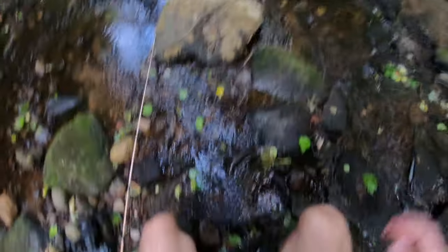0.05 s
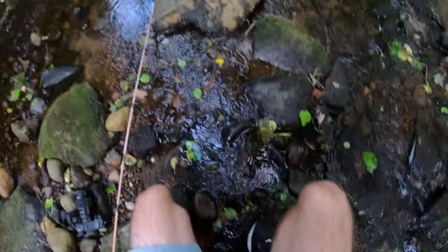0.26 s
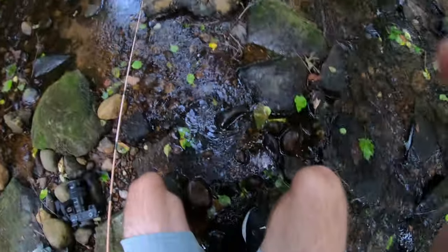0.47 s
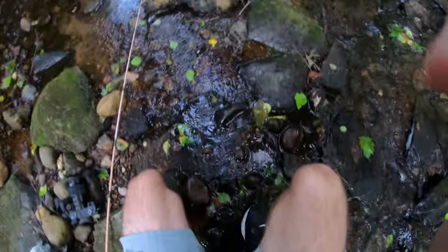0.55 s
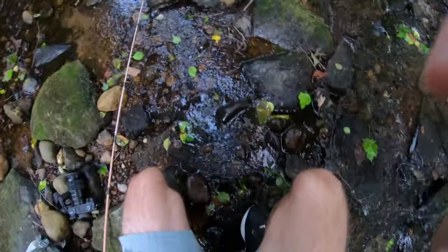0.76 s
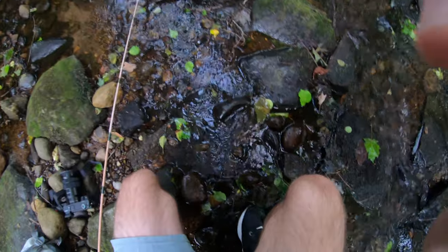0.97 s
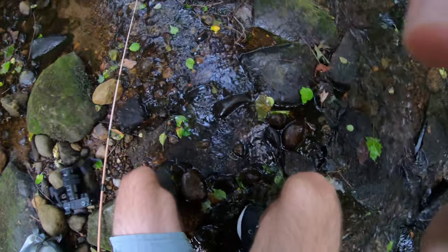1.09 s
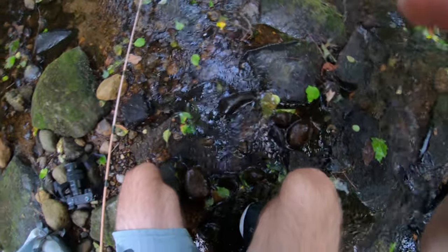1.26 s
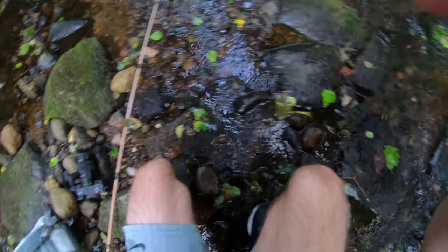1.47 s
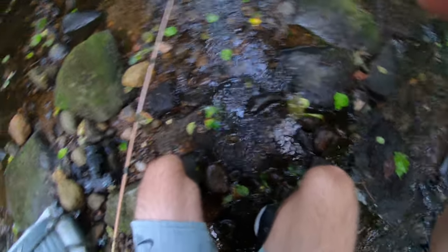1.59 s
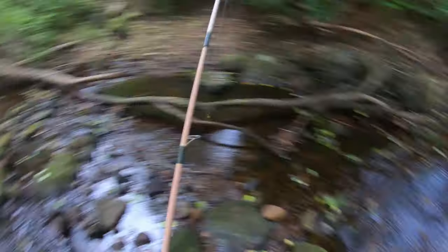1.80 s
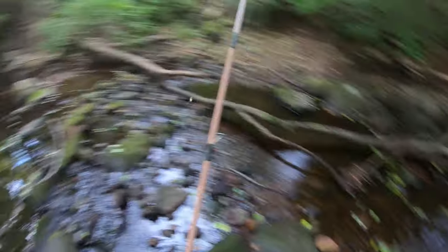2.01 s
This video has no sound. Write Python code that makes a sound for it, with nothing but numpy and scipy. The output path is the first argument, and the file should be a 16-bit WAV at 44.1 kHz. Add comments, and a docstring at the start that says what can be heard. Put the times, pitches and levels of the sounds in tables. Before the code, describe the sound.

A shallow creek runs over stones throughout, a soft wash with small bubbles, tiny drips and low rumble. At about 0.55 seconds a finger rubs the camera case with gritty hiss and a crack, scraping harder into a loud, left-heavy knock at 0.74. Faint rubbing follows near 0.86. Bubbling thickens from 1.2, the stereo narrows to mono, low glugs come after 1.6, and everything cuts to silence near 1.87.

```python
"""Creek and a finger on a camera case

A shallow creek gurgles over stones: coloured noise for the wash, gliding sine tones for the bubbles,
short rings with a spit of noise for the drips. A finger slides over a small head-worn camera, scrapes
and knocks its case: gritty noise, slip clicks, cracks, squeaks and a quickening swing.
Below lie a lumpy noise rumble, wavering hums and low glugs. The creek narrows to mono; then all is cut off.
"""
import sys
import numpy as np
from scipy import signal
from scipy.fft import rfft, irfft
from scipy.io import wavfile
from scipy.ndimage import uniform_filter1d

SR = 44100
rng = np.random.default_rng(int(sys.argv[2]) if len(sys.argv) > 2 else 0)


def master_out(mix):
    """Clip the mix to full scale and print it as 16-bit PCM to the path in sys.argv[1]."""
    frames = np.transpose(np.atleast_2d(mix))
    ceiling = np.clip(frames, -1, 1)
    pcm = np.round(ceiling * 32767).astype(np.int16)
    wavfile.write(sys.argv[1], SR, pcm)


N = 90316  # length in samples

# Tone colour of the wash, same in both ears: pitch_hz, relative level_db (per Hz)
WASH_COLOUR = [(88, -42.5), (150, 2), (366, -7.5), (1270, -17), (2550, -27.5), (4750, -23.5), (10500, -40),
               (15500, -56)]
# Tone colour of the left-right difference: pitch_hz, relative level_db (per Hz)
WASH_SIDE_COLOUR = [(40, -6), (321, -11), (2920, -5.5), (4030, -19), (5160, -7.5), (9840, -15.5),
                    (15000, -38.5)]
# How strongly the creek sounds over time: time_s, wash_db (rms), fizz_db (rms), side_db (rms)
CREEK_FLOW = [(0, -39.5, -45, -50.5), (.54, -39.5, -48, -47.5), (.8, -38.5, -51, -49),
              (1.1, -40.5, -50, -61), (1.2, -39, -45.5, -61), (1.4, -38.5, -42.5, -75),
              (1.62, -37.5, -40, -81.5), (1.87, -39.5, -41, -99)]
# Single bubbles: start_s, level_db (before the fade-out shape), pitch_hz (at 0.4 of the length)
SINGLE_BUBBLES = [(.023, -25, 1730), (.056, -33, 1230), (0.062, -31.5, 1440), (.114, -35, 1065),
                  (.142, -35, 674), (.237, -30.5, 980), (.273, -34, 1710), (.305, -34, 1525),
                  (.452, -35, 838), (.484, -35, 793), (.57, -31.5, 740), (.806, -35.5, 1043),
                  (.857, -26, 1215), (.941, -32.5, 820), (.954, -36, 1266), (1.015, -33.5, 1090),
                  (1.101, -26, 834), (1.248, -23.5, 758), (1.327, -29.5, 1576), (1.352, -25.5, 828),
                  (1.396, -27, 824), (1.417, -20, 738), (1.462, -29, 947), (1.472, -32, 2175),
                  (1.48, -30, 997), (1.608, -28, 1775), (1.612, -25.5, 1074), (1.622, -30, 850),
                  (1.72, -31.5, 1730), (1.751, -34.5, 800), (1.755, -24.5, 1484), (1.8, -29.5, 1020)]


def creek():
    """Water over stones: noise wash, swarms of bubbles, single bubbles, and a side signal that fades."""
    wash = amp(curve(CREEK_FLOW, 1)) * colour(patchy(patch_db=4.5, flicker_db=1.2), WASH_COLOUR)
    fizz_db = curve(CREEK_FLOW, 2)
    fizz = amp(fizz_db) * swarm(1253, 4500, per_s=4000, cycles=5.3, spread_db=3.5)
    gurgle = amp(fizz_db - 2.0) * swarm(750, 3500, per_s=500, cycles=14, spread_db=3.5, rise=.15)
    sparkle = amp(-64) * swarm(4500, 10000, per_s=200, cycles=5.5, spread_db=2.5)
    mid = wash + fizz + gurgle + sparkle
    for start_s, level_db, pitch_hz in SINGLE_BUBBLES:
        add(mid, start_s, amp(level_db) * bubble(pitch_hz, rise=0.067, length_s=0.01))
    side_noise = colour(patchy(patch_db=7.5, flicker_db=-1.0), WASH_SIDE_COLOUR)
    side = amp(curve(CREEK_FLOW, 3)) * side_noise
    return mid + side * [[1], [-1]]


def swarm(lo_hz, hi_hz, per_s, cycles, spread_db, rise=.05, count=30):
    """Many small bubbles at random moments and sizes, rms 1; low ones ring longer than high ones."""
    out = np.zeros(N)
    for hz in np.geomspace(lo_hz, hi_hz, count):
        size = amp(spread_db * np.minimum(rng.exponential(1, N), 4))
        starts = rng.random(N) < per_s / count / SR
        out += signal.oaconvolve(size * starts, bubble(hz, rise, cycles / hz))[:N]
    return evened(out)


def bubble(hz, rise, length_s):
    """A ringing bubble: quick start, pitch gliding up by rise octaves per length, dying away."""
    t = np.arange(0, 3 * length_s + .002, 1 / SR)
    u = t / (length_s + 1e-4)  # time counted in lengths
    pitch_hz = hz * 2 ** (rise * (u - .4))
    shape = np.minimum(t / .0008, 1) * np.exp(-u ** 1.3)
    return shape * np.sin(2 * np.pi * np.cumsum(pitch_hz) / SR)


def patchy(patch_db, flicker_db):
    """Noise with drifting loud and soft patches, strongest at low pitch, and a wide-band flicker."""
    hz, t, z = signal.stft(rng.standard_normal(N), SR, nperseg=512, noverlap=384)
    patches = uniform_filter1d(rng.standard_normal(z.shape), size=5, axis=0)
    patches = evened(uniform_filter1d(patches, size=10, axis=1))
    flicker = evened(uniform_filter1d(rng.standard_normal(len(t)), size=5))
    level_db = patch_db * patches / (1 + hz[:, None] / 4000) + flicker_db * flicker
    return signal.istft(z * amp(level_db), SR, nperseg=512, noverlap=384)[1][:N]


KNOCK_S = .7388  # moment of the knock
# Finger strength before the stereo lean: time_s, slide_db (light), scrape_db (hard)
RUB_LEVELS = [(.554, -56, -60), (.558, -33.5, -77), (.655, -33, -45.5), (.706, -37.5, -38.5),
              (.719, -31.5, -23.5), (.732, -29, -22), (.735, -40, -31.5), (.738, -19.5, -14.5),
              (.742, -40.5, -26.5), (.746, -43.5, -31.5), (.76, -43.5, -34), (.772, -57, -59),
              (.853, -59, -57.5), (.862, -42, -36), (.9, -52.5, -52), (1.13, -129, -85), (1.15, -48.5, -58),
              (1.18, -53, -65), (1.2, -78, -80)]
# How much louder the rubbing is on the left than on the right: pitch_hz, left_minus_right_db
LEFT_LEAN = [(100, 10.5), (800, 2), (2400, -1.5), (8000, 5)]


def finger():
    """Skin on the camera case, reaching the two ports differently; a knock near the left port."""
    t = np.arange(N) / SR
    grit = amp(1.8 * evened(uniform_filter1d(rng.standard_normal(N), size=50)))
    on = (t > RUB_LEVELS[0][0]) & (t < RUB_LEVELS[-1][0])
    rub = amp(curve(RUB_LEVELS, 1)) * slide(grit) + amp(curve(RUB_LEVELS, 2)) * scrape(grit)
    rub = on * rub + snaps()
    hz, db = np.transpose(LEFT_LEAN)
    lean_db = np.interp(np.log(np.fft.rfftfreq(N, 1 / SR) + 1), np.log(hz), db) / 2
    out = irfft(rfft(rub) * amp([lean_db, -lean_db]), N)
    add(out, KNOCK_S, knock() * amp([[0], [-24.5]]))  # left, right in dB
    return out


# Tone colour of the light slide, same in both ears: pitch_hz, relative level_db (per Hz)
SLIDE_COLOUR = [(800, -10), (1930, -7), (2800, -7), (4500, -10.5), (6900, -10), (9700, -12), (10800, -18.5),
                (15000, -31.5)]
# Tone colour of its left-right difference: pitch_hz, relative level_db (per Hz)
SLIDE_SIDE_COLOUR = [(100, -23.5), (962, -13.5), (1920, 1), (4540, -17.5), (6910, -5), (9660, -13),
                     (15000, -34.5)]


def slide(grit):
    """Gritty hiss of light rubbing; its treble dulls for 0.15 s and stays dull until the knock."""
    dull_above_hz, dull_db_per_s = 7000, -39
    t = np.arange(N) / SR
    mid = colour(patchy(patch_db=6.0, flicker_db=-0.75) * grit, SLIDE_COLOUR)
    side = amp(-0.2) * colour(rng.standard_normal(N) * grit, SLIDE_SIDE_COLOUR)
    hiss = mid + side * [[1], [-1]]
    treble = signal.sosfiltfilt(signal.butter(2, dull_above_hz, "high", fs=SR, output="sos"), hiss)
    dull_db = dull_db_per_s * np.clip(t - RUB_LEVELS[1][0], 0, .15) * (t < KNOCK_S)
    return hiss + treble * (amp(dull_db) - 1)


# Tone colour of the hard scrape, same in both ears: pitch_hz, relative level_db (per Hz)
SCRAPE_COLOUR = [(250, -15), (980, -2.5), (1300, -3.5), (1890, 1), (2300, -19.5), (2780, -7.5), (5000, -19),
                 (9600, -21), (10800, -37), (14500, -58)]
# Tone colour of its left-right difference: pitch_hz, relative level_db (per Hz)
SCRAPE_SIDE_COLOUR = [(100, -7), (900, -5), (1880, -6.5), (2400, -23.5), (9700, -38), (14000, -56.5)]


def scrape(grit):
    """Skin sticks and slips: unevenly timed clicks mixed with noise."""
    typical_slips_per_s, slip_share = 750, .65
    mid_noise, side_noise, jitter = rng.standard_normal((3, N))
    slip_rate = typical_slips_per_s * np.exp(.5 * evened(uniform_filter1d(jitter, size=60)))
    turns = np.cumsum(slip_rate) / SR
    slips = evened(np.diff(np.floor(turns), prepend=0) * grit)  # one click per whole turn
    mid = slip_share * np.roll(slips, 12) + (1 - slip_share) * mid_noise  # 12 samples later
    side = slip_share * slips + (1 - slip_share) * side_noise
    return -colour(mid, SCRAPE_COLOUR) + amp(9.0) * colour(side, SCRAPE_SIDE_COLOUR) * [[-1], [1]]


# Sharp cracks on the case, the last three strikes around the knock: start_s, level_db (before the band filter)
CASE_CRACKS = [(0.6575, -22), (0.6595, -11.5), (0.7372, -15.5), (0.749, -24.5), (0.763, -31)]
# Narrow squeaks of skin on the case: start_s, level_db (rms before fades and filter), pitch_hz, length_s
SKIN_SQUEAKS = [(0.555, -34.5, 6080, .012), (0.592, -38, 6700, 0.019), (0.662, -39, 2900, 0.047),
                (0.666, -35, 1500, 0.032), (1.29, -44.5, 4550, 0.016), (1.289, -49, 5450, .018),
                (1.293, -43, 3180, .016)]


def snaps():
    """Sharp cracks, each a tiny pulse with a short noisy tail, and squeaks made of wavering tones."""
    crack_t60_s, tail_share = 0.0063, 0.2
    out, t = np.zeros(N), np.arange(1000) / SR
    for start_s, level_db in CASE_CRACKS:
        crack = tail_share * rng.standard_normal(1000) - (t < 2 / SR)
        add(out, start_s, amp(level_db - 60 * t / crack_t60_s) * crack)
    for start_s, level_db, pitch_hz, length_s in SKIN_SQUEAKS:
        n = round(length_s * SR)
        squeak = hum(pitch_hz, width_hz=280, steady=0.94)[:n]
        add(out, start_s, amp(level_db) * signal.windows.tukey(n, .5) * squeak)
    return signal.sosfilt(signal.butter(4, [900, 10500], "band", fs=SR, output="sos"), out)


def knock():
    """A short push inward, then the case swings back, quickening until it is held still."""
    push_s, push_db, stop_s = 0.0065, -6.5, 0.031
    swing_hz, swing_hz_per_s, swing_db, swing_t60_s = 47, 2900, -6, 0.28
    t = np.arange(3000) / SR
    u = np.maximum(t - push_s, 0)  # time since the push ended
    cycles = swing_hz * u + swing_hz_per_s * u ** 2 / 2
    swing = amp(swing_db - 60 * u / swing_t60_s) * np.sin(2 * np.pi * cycles)
    push = amp(push_db) * np.sin(np.pi * np.minimum(t / push_s, 1))
    return (swing - push) * np.exp(-(t / stop_s) ** 10)


# Tiny drips: start_s, level_db (of the ring, before it fades), pitch_hz
DRIPS = [(0.144, -35, 6170), (.172, -31, 2470), (.2304, -37.5, 6060), (0.3006, -34, 6750),
         (0.431, -39, 6340), (.4628, -37.5, 7800), (.490, -28.5, 2840), (.803, -41, 6750),
         (1.2163, -40.5, 7750), (1.290, -41, 8130), (1.603, -34, 3360), (1.759, -29.5, 3700)]


def drips():
    """A short ring with a spit of noise around its pitch, its width following the creek's side level."""
    t60_s, noise_share, extra_width_db = 0.022, 0.93, 41
    mid, side, t = np.zeros(N), np.zeros(N), np.arange(1500) / SR
    for start_s, level_db, pitch_hz in DRIPS:
        band = signal.butter(3, [0.56 * pitch_hz, 1.21 * pitch_hz], "band", fs=SR, output="sos")
        spit = signal.sosfilt(band, rng.standard_normal((2, 1500)))
        shape = np.minimum(t / 0.0011, 1) * amp(level_db - 60 * t / t60_s)
        ring = np.sin(2 * np.pi * pitch_hz * t)
        add(mid, start_s, shape * (ring + noise_share * evened(spit[0])))
        add(side, start_s, shape * evened(spit[1]))
    return mid + side * amp(curve(CREEK_FLOW, 3) + extra_width_db) * [[1], [-1]]


# Tone colour of the rumble: pitch_hz, relative level_db (per Hz)
RUMBLE_COLOUR = [(20, 4.5), (102, -1), (400, -20.5), (520, -31)]
# Rumble over time: time_s, level_db (rms, before a 2 dB lift)
RUMBLE_LEVELS = [(0, -38), (.2, -37.5), (.4, -43.5), (.68, -36.5), (.9, -42), (1.45, -39), (1.58, -41),
                 (1.66, -36.5), (1.87, -34)]
# Swelling 160 Hz hum: time_s, level_db (rms)
SWELL_LEVELS = [(0, -45), (.3, -39), (.4, -55), (1.03, -38.5), (1.25, -45.5), (1.33, -39.5), (1.5, -38.5),
                (1.6, -57.5), (1.87, -49)]
# Even hums: pitch_hz, width_hz (of each waver filter), level_db (rms)
EVEN_HUMS = [(360, 4, -47.5), (106, 10, -44)]
# Low glugs: start_s, level_db (before it fades), pitch_hz, t60_s (time to fade by 60 dB)
LOW_GLUGS = [(1.643, -25, 104.8, 0.2), (1.68, -26, 241, 0.091), (1.805, -19, 101.5, 0.175)]


def low_sounds():
    """Lumpy noise rumble, wavering hums and a few low glugs made of fading sine tones."""
    out = amp(curve(RUMBLE_LEVELS, 1) + 2.0) * colour(rng.standard_normal(N), RUMBLE_COLOUR)
    out += amp(curve(SWELL_LEVELS, 1)) * hum(160, width_hz=19)
    for pitch_hz, width_hz, level_db in EVEN_HUMS:
        out += amp(level_db) * hum(pitch_hz, width_hz)
    t = np.arange(9000) / SR
    for start_s, level_db, pitch_hz, t60_s in LOW_GLUGS:
        shape = np.minimum(t * pitch_hz, 1) * amp(level_db - 60 * t / t60_s)  # fades in over one cycle
        add(out, start_s, -shape * np.sin(2 * np.pi * pitch_hz * t))
    return out


def hum(hz, width_hz, steady=1.4):
    """A tone, rms 1: a steady part (its size against the waver) plus slowly wavering smoothed noise."""
    r = np.exp(-np.pi * width_hz / SR)
    waver = rng.standard_normal((N, 2)) @ [1, 1j]
    for _ in range(2):
        waver = signal.lfilter([1], [1, -r], waver)
    waver = steady + waver / np.sqrt(np.mean(abs(waver) ** 2))
    return evened((waver * np.exp(2j * np.pi * hz * np.arange(N) / SR)).real)


def amp(db):
    """Decibels to a plain factor."""
    return 10 ** (np.asarray(db) / 20)


def evened(x):
    """Scales a signal to rms 1."""
    return x / np.sqrt(np.mean(x ** 2) + 1e-20)


def curve(rows, col):
    """One column of a table, drawn as straight lines over time."""
    rows = np.array(rows)
    return np.interp(np.arange(N) / SR, rows[:, 0], rows[:, col])


def add(mix, start_s, sound):
    """Adds a sound into the mix at its start time, cutting what runs past the end."""
    part = mix[..., max(round(start_s * SR), 0):][..., :sound.shape[-1]]
    part += sound[..., :part.shape[-1]]


def colour(x, points):
    """Filters a signal by a tone colour table, rms 1."""
    f, db = np.transpose(points)
    hz = np.fft.rfftfreq(N, 1 / SR)
    gain_db = np.interp(np.log(hz + 1), np.log(f + 1), db, left=-60, right=-90)
    return evened(irfft(rfft(x) * amp(gain_db), N))


def scene():
    """All sources together, left and right."""
    return creek() + finger() + drips() + low_sounds()


def record(dry):
    """Overload clips the peaks, a 1 ms fade cuts to silence, then a filter removes the top treble."""
    end_s, edge_hz = 1.868, 15750
    fade = np.clip((end_s - np.arange(N) / SR) / .001, 0, 1)
    cut = np.clip(dry, -.96, .96) * fade
    lowpass = signal.firwin(511, edge_hz, window=("kaiser", 9), fs=SR)
    return signal.oaconvolve(cut, lowpass[None], "same")


dry = scene()
out = record(dry)
master_out(out)
```